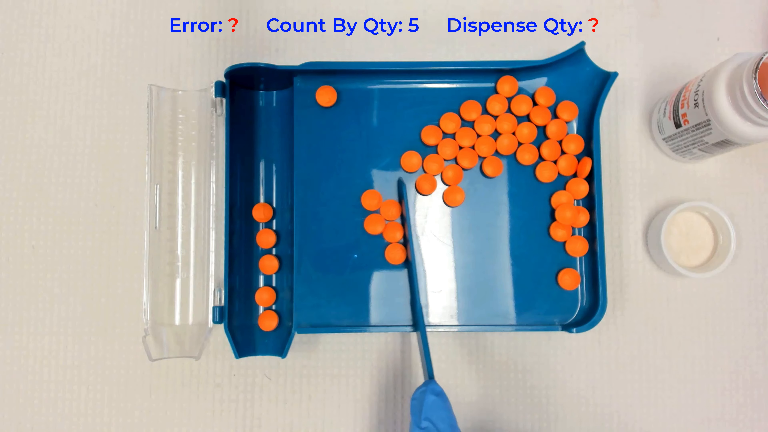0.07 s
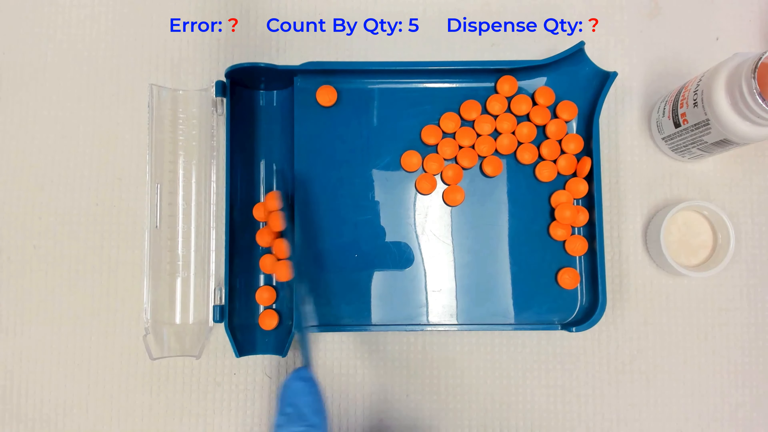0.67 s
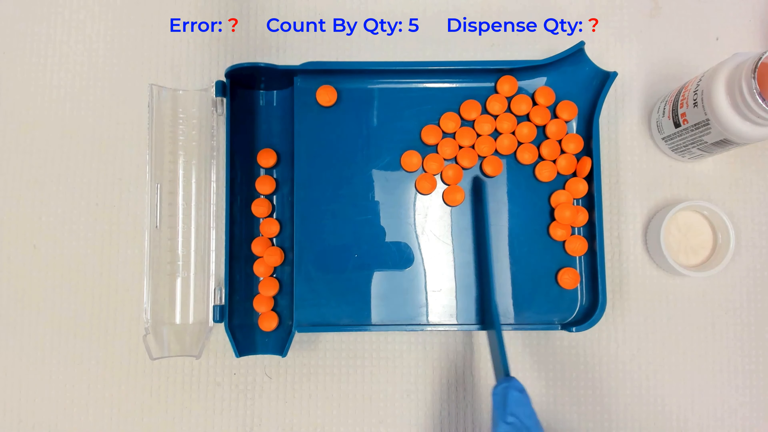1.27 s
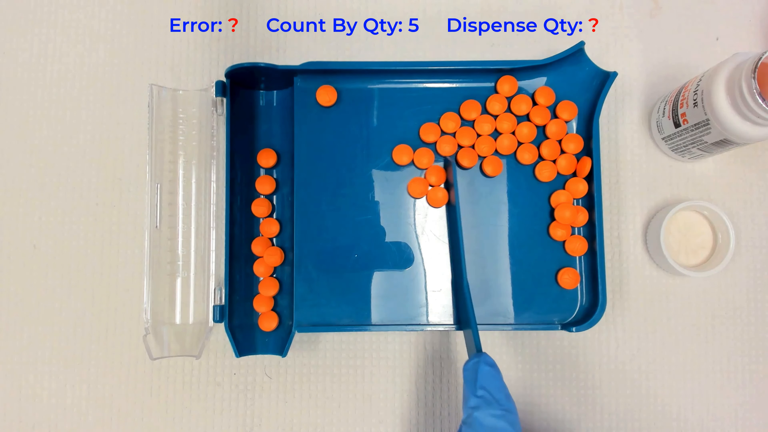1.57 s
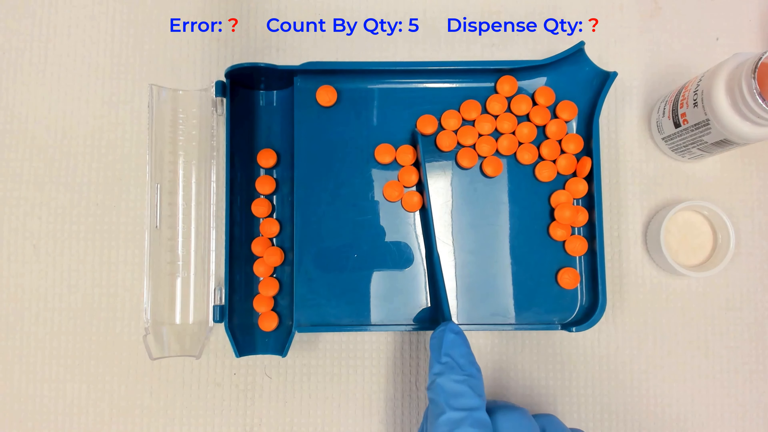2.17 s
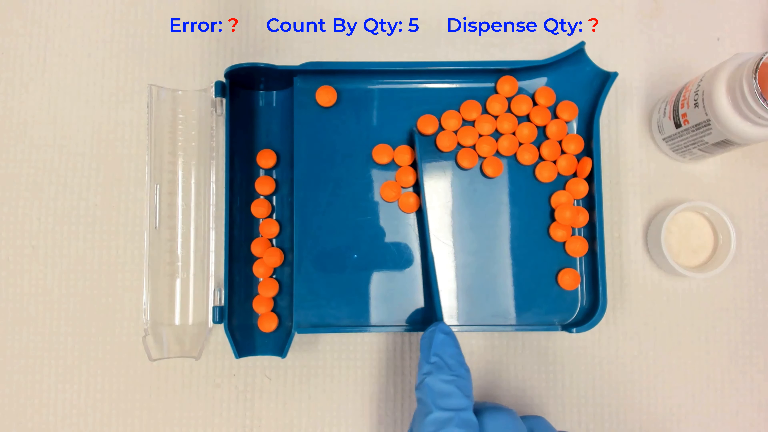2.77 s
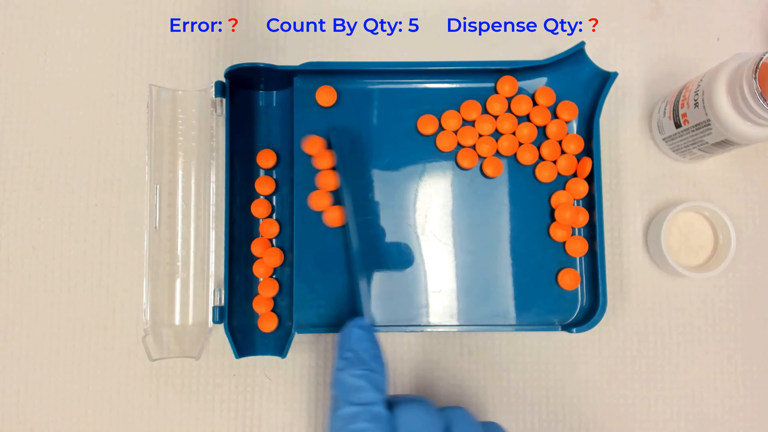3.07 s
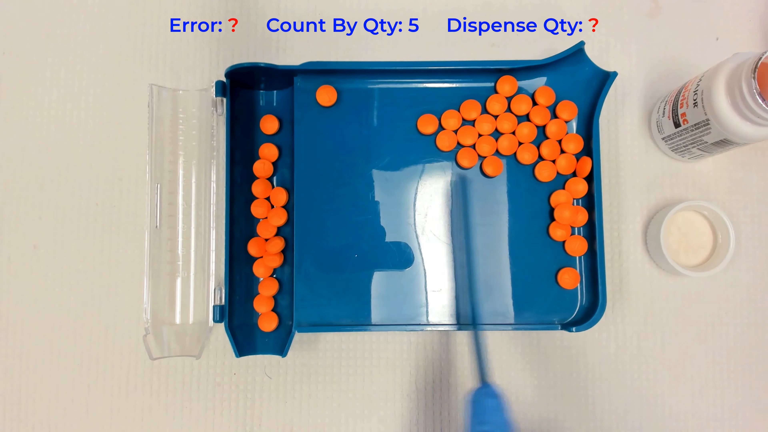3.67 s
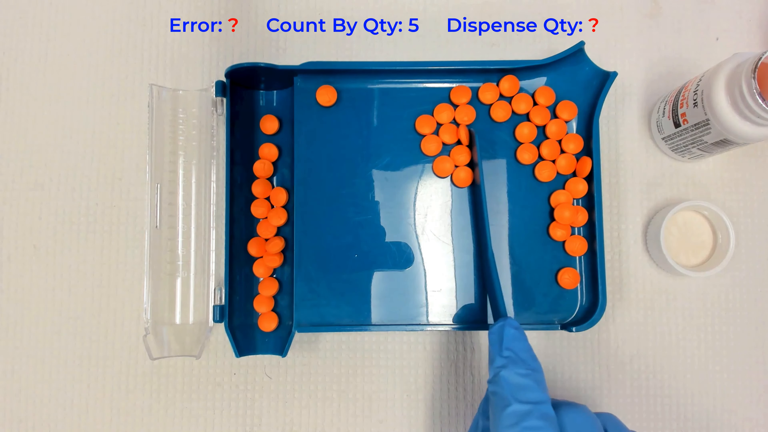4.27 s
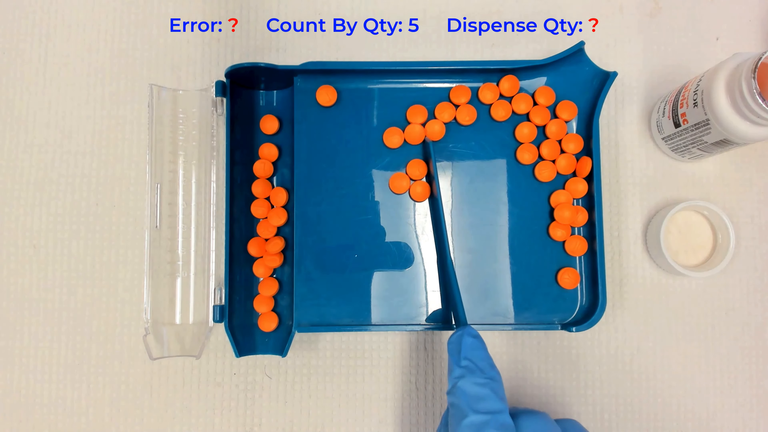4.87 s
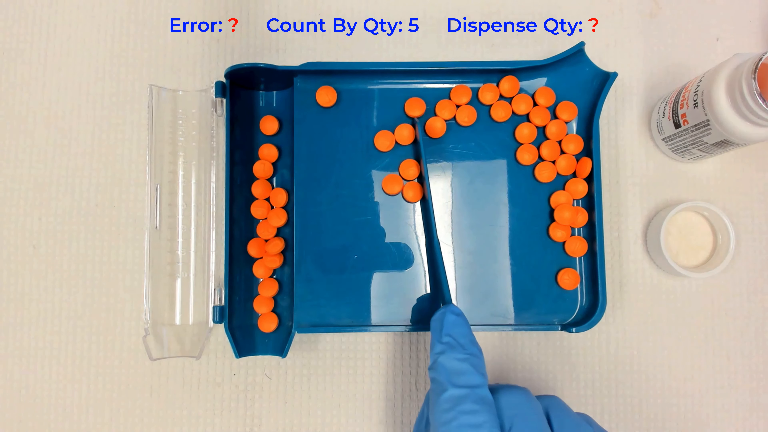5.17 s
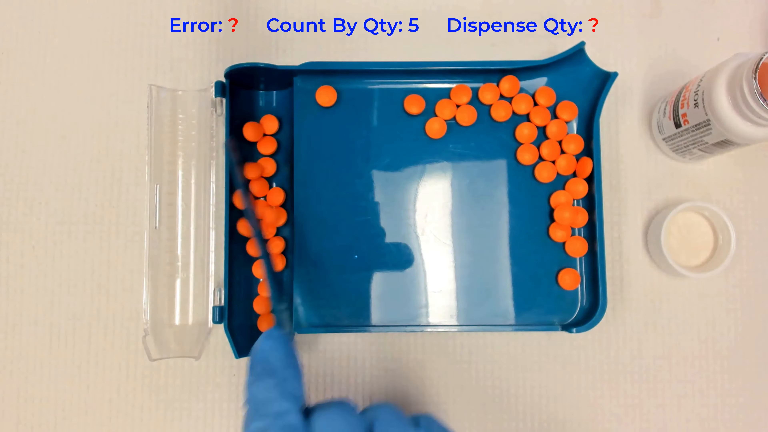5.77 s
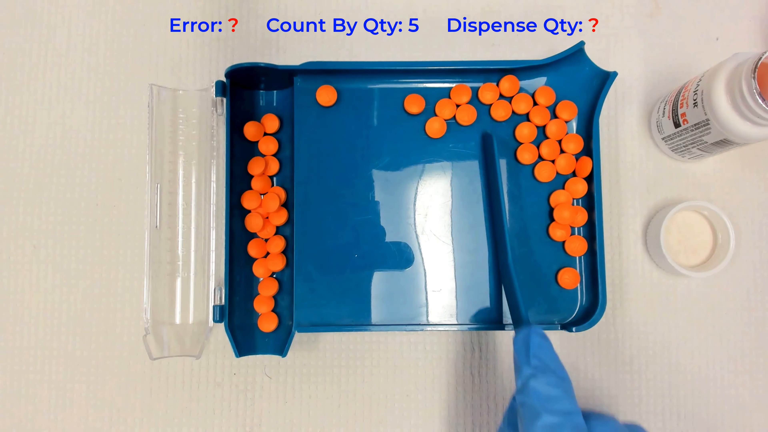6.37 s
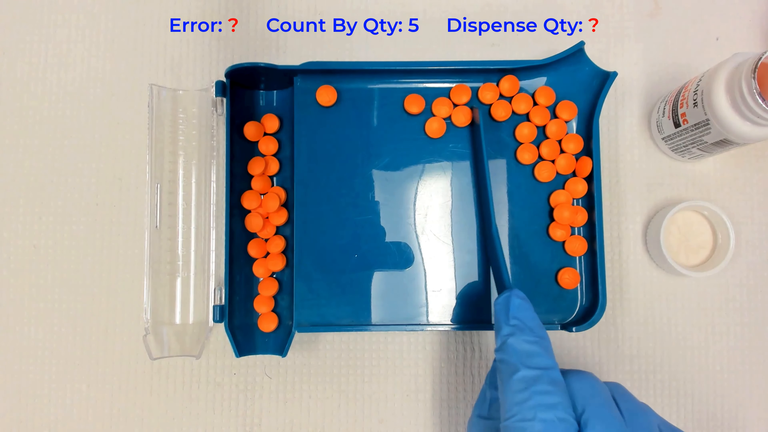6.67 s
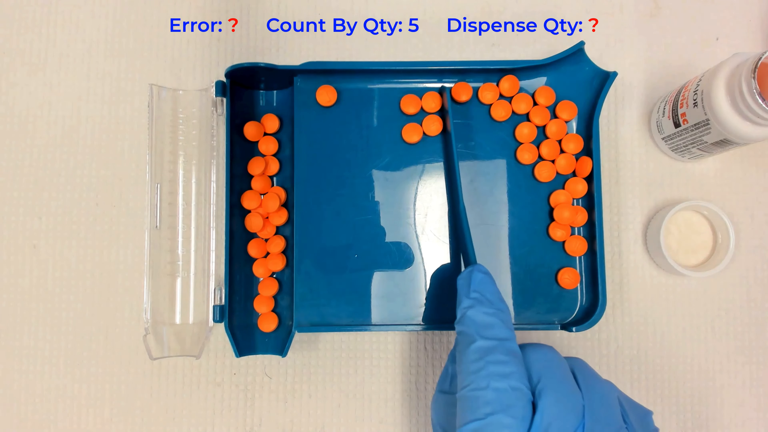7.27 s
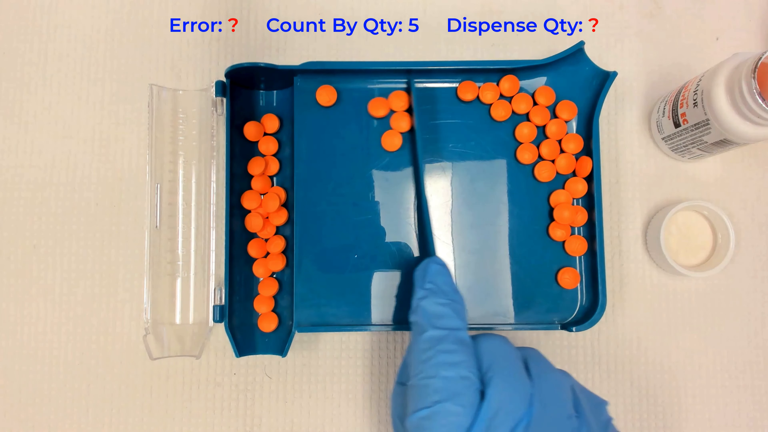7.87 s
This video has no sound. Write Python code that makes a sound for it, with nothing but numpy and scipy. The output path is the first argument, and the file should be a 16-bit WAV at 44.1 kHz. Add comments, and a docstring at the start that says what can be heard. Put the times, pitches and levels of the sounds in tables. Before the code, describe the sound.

A spatula slides hard tablets across a plastic counting tray with soft scrapes and light clicks. Three times, a few seconds apart, a small group drops into the side trough with a bright, brief clatter and bounces to rest. Between and after the drops, tablets jostle quietly as the spatula picks out more. The sound is close, in a small room with faint ventilation hum.

```python
"""Hard tablets clatter into the side trough of a plastic counting tray and bounce to rest.
A spatula picks them out with light taps, slides them jostling over the tray floor and three
times sweeps a group over the edge. Each hit is a noisy crack plus the ring of the plastic;
the slide is a stream of tiny slips. Behind it are a small room, ventilation air and hum,
and the low rumble of the moving hand."""
import sys
import numpy as np
from scipy import signal
from scipy.fft import rfft, irfft, next_fast_len
from scipy.io import wavfile

SR = 44100
rng = np.random.default_rng(int(sys.argv[2]) if len(sys.argv) > 2 else 0)


def dump_mix(stems):
    """Bounce the given channels to the path in sys.argv[1] as a 16-bit WAV at rate SR."""
    frames = np.atleast_2d(stems).T  # one column per channel
    limited = np.clip(frames, -1, 1)  # hard clip at full scale
    pcm = np.round(limited * 32767).astype(np.int16)
    wavfile.write(sys.argv[1], SR, pcm)


N = 353241
TIME = np.arange(N) / SR
AGE = np.arange(SR // 6) / SR  # seconds since a contact


def clatter(rebounds_per_s=125, lead_s=0.022, gather_db_per_s=400.5):
    """Tablets spill just ahead of the blade: hard landings, then rebounds that gather and settle."""
    # The hardest landings. Each row: start in seconds, relative level in dB.
    drops = [(0.5459, -4.5), (0.5507, -10.5), (0.5755, -13), (0.5784, -2), (0.596, -5.5), (0.627, -7.5),
             (0.649, -11.5), (0.6704, -11.5), (0.698, -14.5), (0.7155, -19), (0.753, -16), (0.7899, -15),
             (0.807, -18), (0.839, -22.5), (0.8821, -25.5), (3.0841, -7.5), (3.113, -1.5), (3.1202, -4.5),
             (3.1326, -9), (3.1573, -13.5), (3.1783, -14), (3.2182, -10), (3.2396, -15), (5.6611, -4),
             (5.6743, -2.5), (5.69, -3.5), (5.6945, -1.5), (5.7113, -6.5), (5.7517, -17), (5.7897, -17),
             (5.88, -30.5)]
    # Sweeps into the trough. Each row: time of the blade's knock in seconds, knock level in dB,
    # rattle level in dB, settling rate in dB per second, rattle length in seconds.
    sweeps = [(0.5794, -43, -16, 91, 0.33), (3.1183, -55, -15, 104, 0.14), (5.6914, -22.5, -14, 200, 0.22)]
    tablets, knocks = np.zeros((2, N))
    for start_s, level_db in drops:
        tilt_db = -0.2 + 0.3 * level_db  # softer landings are duller
        add(tablets, start_s, from_db(level_db - 5.5) * landing(tilt_db))
    rebounds = [landing(tilt_db) for tilt_db in rng.normal(-2, 2, size=24)]
    for knock_s, knock_db, rattle_db, settle_db_per_s, length_s in sweeps:
        add(knocks, knock_s, from_db(knock_db) * wall_knock())
        gaps, forces, picks = rng.random((160, 3)).T
        ages = np.cumsum(0.5 + gaps) / rebounds_per_s - lead_s
        for age, force, pick in zip(ages[ages < length_s], forces, picks):
            below_peak_db = max(-gather_db_per_s * age, settle_db_per_s * age)
            level_db = rattle_db - below_peak_db + 2 * (2 * force - 1)
            add(tablets, knock_s + age, from_db(level_db) * rebounds[int(pick * len(rebounds))])
    low_cut = signal.butter(4, 720, "high", fs=SR, output="sos")  # tablets are too light for bass
    return signal.sosfilt(low_cut, tablets) + knocks


def landing(tilt_db):
    """One tablet strikes the trough: a hard click, a crack, then the ring of the plastic."""
    # Crack of a hard tablet on plastic. Each row: frequency in Hz, relative level in dB.
    spectrum = [(300, -31.5), (700, -38), (1000, -31.5), (1500, -19.5), (1900, 2.5), (3200, 2), (5500, 6.5),
                (7000, -2), (10000, -2), (11500, -23)]
    # Ring of the trough. Each row: frequency in Hz, relative level in dB, t60 in seconds.
    trough_modes = [(838, -26.5, 0.14), (1105, -19, 0.065), (1766, -11, 0.12), (1820, -8.5, 0.16),
                    (1911, -5, 0.072), (2209, -6.5, 0.079), (2287, 2.5, 0.059), (2286, -10, 0.074),
                    (2570, -9, 0.083), (2868, 2, 0.046), (2910, -5, 0.081), (3657, -3.5, 0.055),
                    (3960, -5, 0.051), (4680, -17.5, .05), (4620, 1.5, 0.064), (5090, -1, 0.03),
                    (5350, -5.5, 0.082), (5630, -1.5, 0.06), (6230, -7, 0.047), (6500, -5, 0.085),
                    (7050, -8.5, 0.064), (7860, -8, 0.065), (8750, -2, .03)]
    click = from_db(-4.5) * crack(spectrum, tilt_db + 1.5, t60=0.0049)
    body = crack(spectrum, tilt_db, t60=0.024)
    ring = from_db(-1) * ringing(trough_modes, tilt_db, spread_db=3.5)
    return unit_attack(click + body + ring)


def wall_knock():
    """The blade meets the trough wall: a thud and the dull ring of the whole tray."""
    # Ring of the whole tray. Each row: frequency in Hz, relative level in dB, t60 in seconds.
    tray_modes = [(152, 4, 0.022), (260, -17.5, .03), (394, 3, 0.022), (570, -2, 0.03), (829, 16.5, 0.032)]
    # Blunt push of the blade. Each row: frequency in Hz, relative level in dB.
    spectrum = [(30, 12), (90, 6.5), (180, -7), (650, 4.5), (1200, -13)]
    ring = ringing(tray_modes, tilt_db=0, spread_db=6.5)
    thud = from_db(1.5) * crack(spectrum, tilt_db=0, t60=0.03)
    return unit_attack(ring + thud)


def spatula_taps():
    """The spatula picks out tablets, tapping against them and the tray."""
    # Each row: start in seconds, relative level in dB, tilt in dB per octave, chatter t60 in seconds.
    taps = [(0.0192, -38, -6, 0.065), (0.439, -35.5, -2, 0.076), (1.0786, -39, -3.5, 0.11),
            (1.224, -30.5, -4, 0.048), (1.2629, -39.5, 2, .04), (1.4294, -42.5, -1, .05),
            (1.499, -37.5, -0.5, 0.074), (1.886, -38.5, -3, 0.039), (2.6562, -42, -3, .065),
            (2.8679, -39, 4, .05), (2.9028, -30.5, -2, 0.084), (3.024, -28.5, 8, .065),
            (3.075, -32.5, 5, .045), (3.7237, -26, -2, 0.054), (3.8046, -29, 1, 0.09),
            (3.958, -32.5, 1.5, 0.12), (4.0406, -28, 3.5, 0.054), (4.4124, -35, -1, .06),
            (4.7059, -26.5, 3, 0.041), (4.9313, -40, 1, .04), (4.982, -39, 1, 0.051),
            (5.2086, -38, 1, .065), (5.2845, -31, 1.5, 0.061), (5.397, -29, 0, .045), (5.481, -25, 1, .02),
            (5.5683, -27.5, 3, .065), (5.6322, -24, 5.5, .05), (5.643, -24.5, -2.5, 0.078),
            (6.4378, -34.5, -1, 0.043), (6.878, -38, -2.5, 0.063), (7.269, -37.5, 1.5, .03),
            (7.6717, -27.5, 3, 0.062), (7.8983, -26.5, 9, 0.02)]
    out = np.zeros(N)
    for start_s, level_db, tilt_db, chatter_t60 in taps:
        add(out, start_s, from_db(level_db - 2) * touch(tilt_db, chatter_t60))
    return out


def touch(tilt_db, chatter_t60):
    """A light contact: a sharp snap, a short chatter of the parts and the ring of the tray floor."""
    # Crack of a light tap. Each row: frequency in Hz, relative level in dB.
    spectrum = [(300, -32.5), (700, -22), (1100, -3.5), (2000, 2.5), (3600, 7.5), (5500, 3), (7500, -5.5),
                (10000, -11), (11500, -27.5)]
    # Ring of the tray floor. Each row: frequency in Hz, relative level in dB, t60 in seconds.
    floor_modes = [(1170, -6.5, 0.1), (1334, -8.5, 0.052), (1810, -0.5, 0.06), (1916, 0.5, 0.03),
                   (2495, -5, 0.053), (2935, -6, .04), (3380, -7, 0.069), (3740, 2.5, .035),
                   (4600, -12, .03), (5570, -3.5, 0.031)]
    snap = crack(spectrum, tilt_db, t60=0.014)
    chatter = from_db(-1) * crack(spectrum, tilt_db, chatter_t60)
    ring = from_db(-4) * ringing(floor_modes, tilt_db, spread_db=6)
    return unit_attack(snap + chatter + ring)


def jostling(bumps_per_s=22):
    """Pushed tablets bump into each other at uneven intervals, harder in a faster push."""
    out = np.zeros(N)
    bumps = [touch(tilt_db, chatter_t60=0.044) for tilt_db in rng.normal(-0.2, 2, size=16)]
    jitter, forces, picks = rng.random((400, 3)).T
    times = (np.arange(len(jitter)) + jitter) / bumps_per_s
    levels_db = push_db(times) + 2.5 + 5 * forces
    for start_s, level_db, pick in zip(times[times < TIME[-1]], levels_db, picks):
        add(out, start_s, from_db(level_db) * bumps[int(pick * len(bumps))])
    return out


def sliding(slips_per_s=2500):
    """Tiny slips excite the tray floor; its lowest resonance stands out most in slow pushes."""
    # Sliding friction. Each row: frequency in Hz, relative level in dB.
    spectrum = [(400, -25), (850, -8.5), (1170, -7), (1500, 4.5), (1850, 3.5), (2200, 1.5), (3600, 0),
                (5500, -8.5), (7500, -16), (11500, -21)]
    # Floor resonances. Each row: centre in Hz, width in Hz, level in dB at 0 dB of friction,
    # share of the friction's dB swing that it follows.
    resonances = [(1161, 140, -33, 0.49), (1796, 400, -20.5, 1.0)]
    sizes = from_db(1.5 * np.minimum(rng.exponential(1, N), 4))
    signs = rng.choice([-1, 1], N)
    slips = sizes * signs * (rng.random(N) < slips_per_s / SR)
    friction_db = push_db(TIME) + 3.5 * drift(60)
    out = from_db(friction_db - 6) * coloured(slips, spectrum)
    for hz, width_hz, level_db, share in resonances:
        hollow = signal.lfilter(*signal.iirpeak(hz, hz / width_hz, fs=SR), slips)
        out += from_db(level_db + share * friction_db) * unit_rms(hollow)
    return out


def push_db(t, onset_db_per_s=900, release_db_per_s=250):
    """Friction in dB: each push sets in, grows or eases with the blade's speed, and dies away."""
    # Spatula pushes. Each row: start and end in seconds, relative level at start and end in dB.
    strokes = [(0.0, 0.276, -54.5, -48), (0.393, 0.55, -46, -47), (1.231, 1.33, -55, -57.5),
               (1.473, 2.04, -56, -61.5), (2.642, 3.034, -58.5, -36.5), (3.855, 4.049, -45.5, -41.5),
               (4.198, 4.798, -60, -54), (4.863, 5.04, -55.5, -58), (5.215, 5.66, -57.5, -37),
               (6.39, 6.46, -59, -60), (6.65, 7.02, -60.5, -61.5), (7.78, 8.01, -48.5, -40)]
    levels = []
    for start, end, first_db, last_db in strokes:
        onset_db = onset_db_per_s * np.maximum(start - t, 0)
        release_db = release_db_per_s * np.maximum(t - end, 0)
        levels.append(np.interp(t, [start, end], [first_db, last_db]) - onset_db - release_db)
    return np.max(levels, axis=0)


def crack(spectrum, tilt_db, t60):
    """A crowd of heavily damped modes, heard as a short burst of noise."""
    return unit_attack(coloured(rng.standard_normal(len(AGE)), spectrum, tilt_db) * fade(AGE, t60))


def ringing(modes, tilt_db, spread_db):
    """Each contact point excites the modes with strengths and signs of its own."""
    hz, level_db, t60 = np.transpose(modes)[:, :, None]
    strength = from_db(level_db + tilt_db * np.log2(hz) + spread_db * rng.standard_normal(hz.shape))
    sign = rng.choice([-1, 1], hz.shape)
    partials = sign * strength * np.sin(2 * np.pi * hz * AGE) * fade(AGE, t60)
    return unit_attack(partials.sum(axis=0))


def room(x, gap_s=0.004, build_s=0.0047):
    """Diffuse reflections build up after a short gap and die band by band."""
    # Decay of the small room. Each row: frequency in Hz, t60 in seconds.
    decay = [(300, 0.13), (1800, 0.24), (5000, 0.28), (10000, 0.25)]
    t = np.arange(SR // 2) / SR
    white = rng.standard_normal((2, len(t)))
    response = np.zeros(len(t))
    edges_hz = np.geomspace(150, 14000, 9)
    for k, band in enumerate(zip(edges_hz, edges_hz[1:])):
        noise = signal.sosfilt(signal.butter(2, band, "band", fs=SR, output="sos"), white[k % 2])
        response += noise * fade(t, at_hz(decay, np.sqrt(np.prod(band))))
    response *= np.clip((t - gap_s) / build_s, 0, 1)
    return signal.fftconvolve(x, response / np.linalg.norm(response))[:N]


def ventilation():
    """Steady rushing air over the slightly wavering hum of fan motor and mains."""
    # Room air. Each row: frequency in Hz, relative level in dB.
    air_spectrum = [(20, -7.5), (60, -1), (100, 1.5), (150, -5.5), (280, -6), (360, 1.5), (480, -4),
                    (620, -9.5), (1200, -12), (2200, -15), (4000, -16), (7000, -17.5), (10500, -18),
                    (12000, -21.5)]
    # Hum tones. Each row: frequency in Hz, rms level in dB.
    hum_tones = [(29.8, -70), (60, -71.5), (90, -51.5), (120, -60.5), (199.2, -71), (256, -72.5),
                 (342, -67), (797, -72)]
    air = from_db(-52.5) * coloured(rng.standard_normal(N), air_spectrum)
    hum = np.zeros(N)
    for hz, level_db in hum_tones:
        phase = 2 * np.pi * (hz * TIME + rng.random()) + 0.15 * drift(4.3)
        hum += np.sqrt(2) * from_db(level_db + 0.2 * drift(4.4)) * np.sin(phase)
    return air + hum


def hand_rumble(rest_db=-69.5, half_width_s=0.08):
    """A low rumble swells and fades with each move of the hand over the bench."""
    # Each row: fastest moment of the move in seconds, level in dB.
    moves = [(0.66, -57), (1.56, -53), (3.22, -55), (5.559, -57), (6.3, -50)]
    spectrum = [(15, -7.5), (35, 6), (65, 2), (130, -21), (400, -66)]  # Hz, relative dB
    swells = sum(from_db(level_db) / (1 + ((TIME - s) / half_width_s) ** 2) for s, level_db in moves)
    return (from_db(rest_db) + swells) * coloured(rng.standard_normal(N), spectrum)


def coloured(x, spectrum, tilt_db=0):
    """Shapes noise to a spectrum at rms 1, tilted by tilt_db per octave above 1 kHz."""
    size = next_fast_len(len(x))
    hz = np.arange(size // 2 + 1) * SR / size
    gain = from_db(at_hz(spectrum, hz) + tilt_db * np.log2(np.maximum(hz, 1000)))
    return unit_rms(irfft(rfft(x, size) * gain, size)[:len(x)])


def drift(knots_per_s):
    """A random wander between knots of rms 1."""
    knots = rng.standard_normal(int(TIME[-1] * knots_per_s) + 2)
    return np.interp(TIME * knots_per_s, np.arange(len(knots)), unit_rms(knots))


def from_db(db):
    return 10 ** (np.asarray(db) / 20)


def unit_rms(x):
    return x / np.sqrt(np.mean(x ** 2) + 1e-20)


def unit_attack(x):
    """Scales a hit to rms 1 over its first 4 ms."""
    return x / np.sqrt(np.mean(x[:SR * 4 // 1000] ** 2) + 1e-20)


def at_hz(points, hz):
    """Reads a curve along a log frequency axis."""
    freqs, values = np.transpose(points)
    return np.interp(np.log(np.maximum(hz, 1)), np.log(freqs), values)


def fade(t, t60):
    """Falls by 60 dB in t60 seconds."""
    return np.exp(-np.log(1000) * t / t60)


def add(out, start_s, sound):
    """Mixes a sound in at start_s."""
    start = int(np.clip(start_s * SR, 0, N - 1))
    out[start:start + len(sound)] += sound[:N - start]


def scene():
    """The tray in its room, over the ventilation and the moving hand; mono."""
    tray = clatter() + spatula_taps() + jostling() + sliding()
    return (tray + from_db(-8) * room(tray) + ventilation() + hand_rumble())[None]


def record(dry, ceiling=0.9, knee=3.0, cutoff_hz=11400):
    """Rounds the loudest peaks and cuts the top end."""
    rounded = dry / (1 + np.abs(dry / ceiling) ** knee) ** (1 / knee)
    low_pass = signal.ellip(10, 0.1, 80, cutoff_hz, fs=SR, output="sos")
    return signal.sosfilt(low_pass, rounded)


dry = scene()
out = record(dry)
dump_mix(out)
```